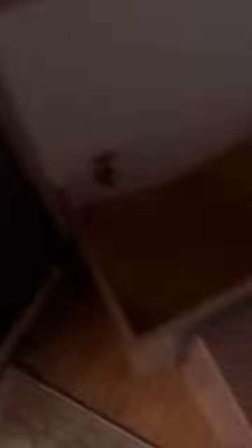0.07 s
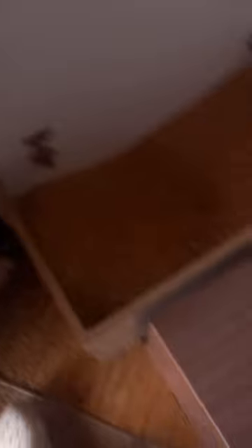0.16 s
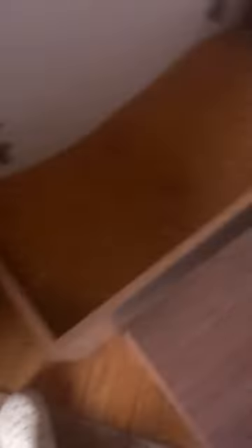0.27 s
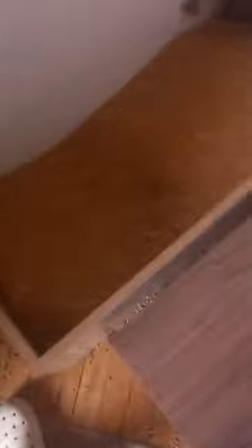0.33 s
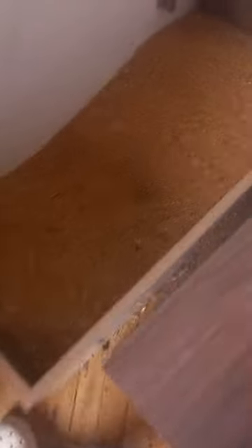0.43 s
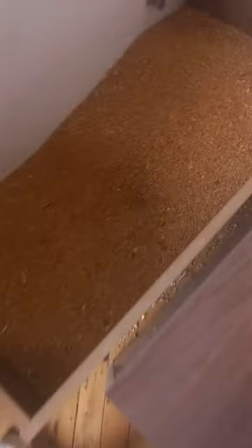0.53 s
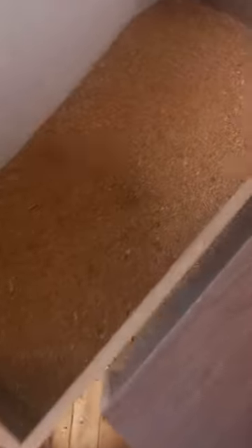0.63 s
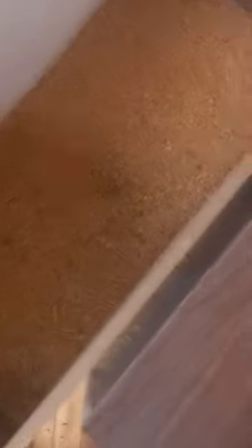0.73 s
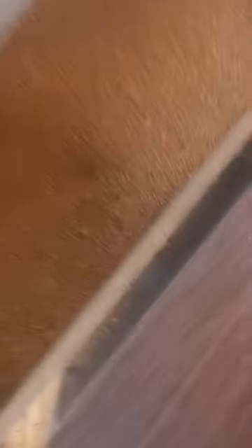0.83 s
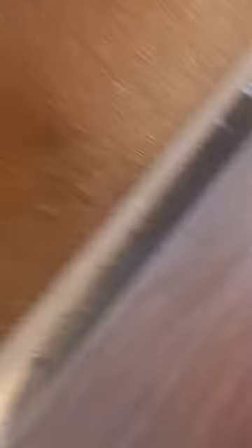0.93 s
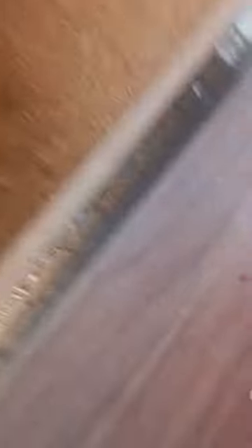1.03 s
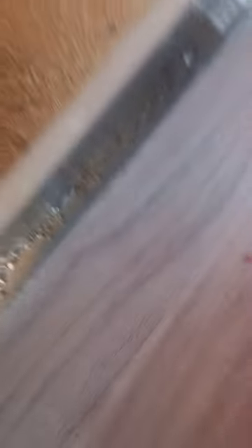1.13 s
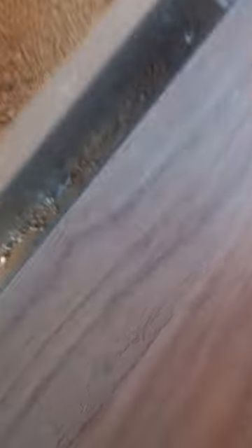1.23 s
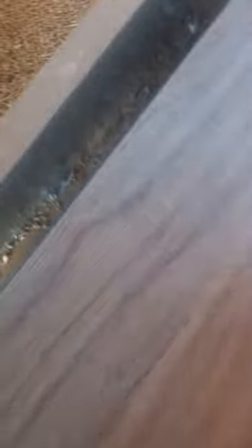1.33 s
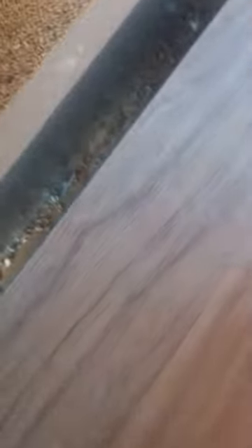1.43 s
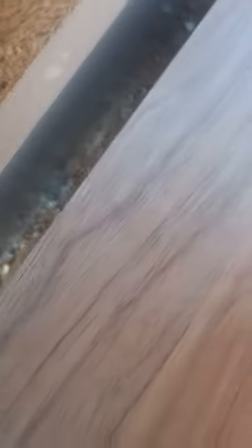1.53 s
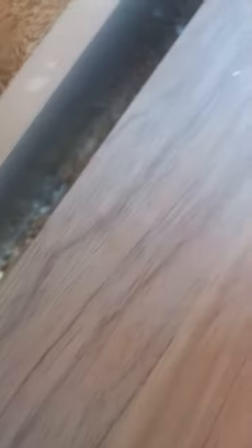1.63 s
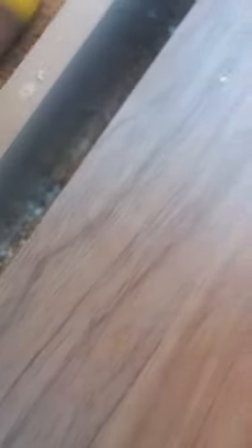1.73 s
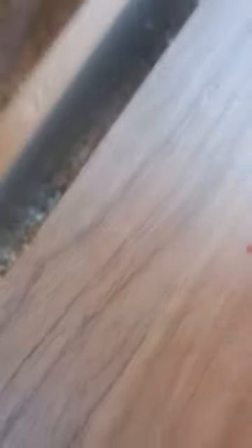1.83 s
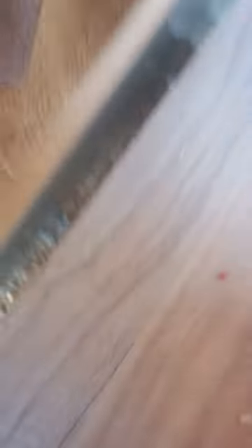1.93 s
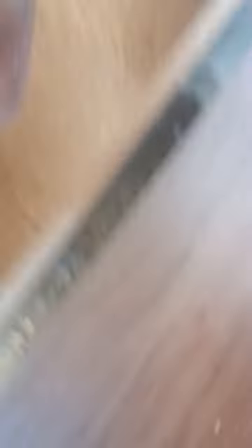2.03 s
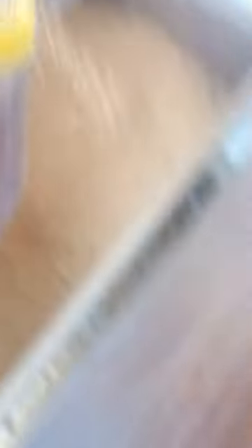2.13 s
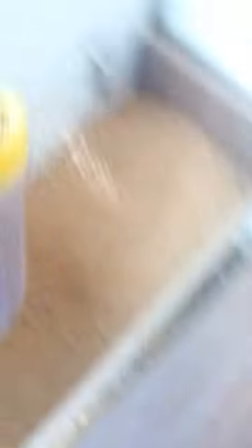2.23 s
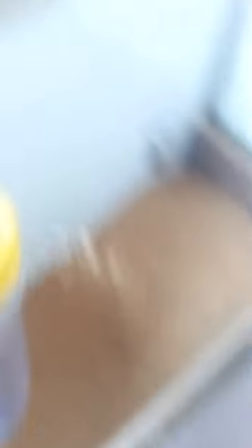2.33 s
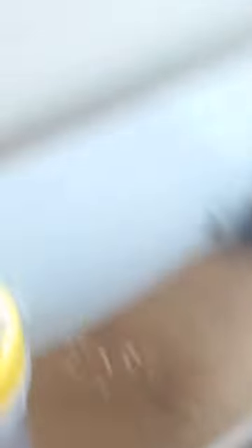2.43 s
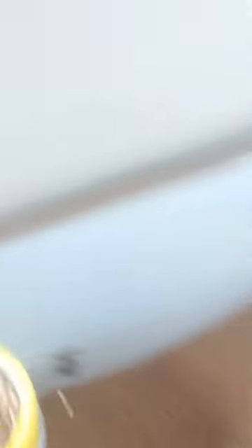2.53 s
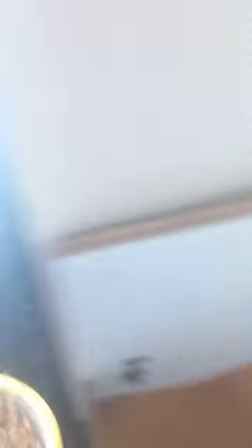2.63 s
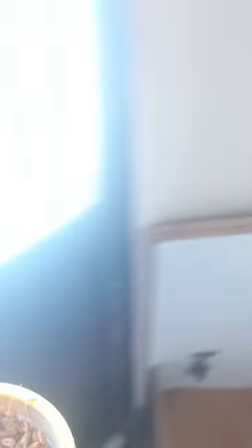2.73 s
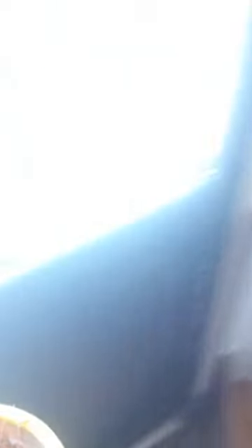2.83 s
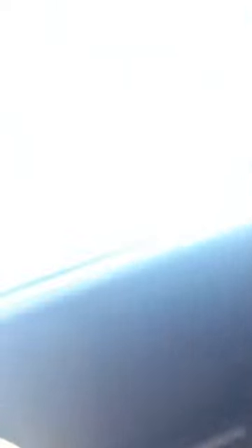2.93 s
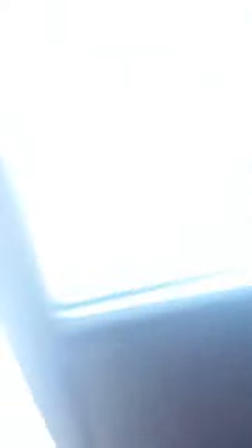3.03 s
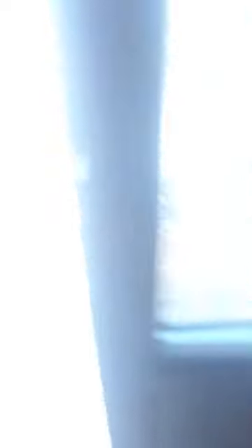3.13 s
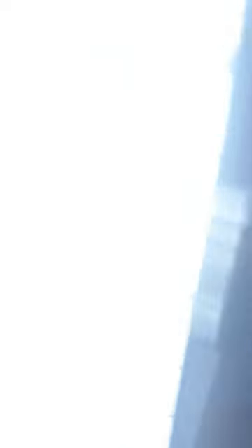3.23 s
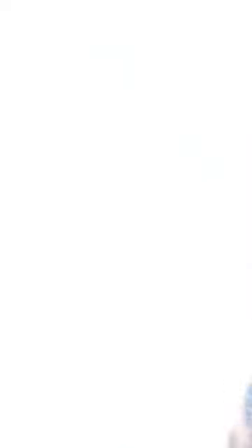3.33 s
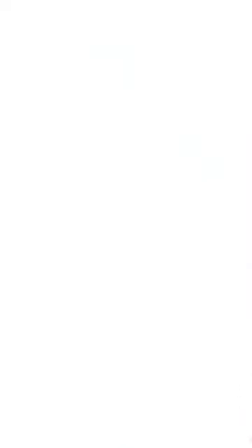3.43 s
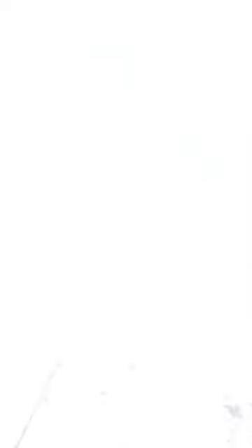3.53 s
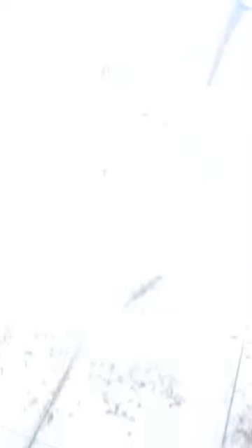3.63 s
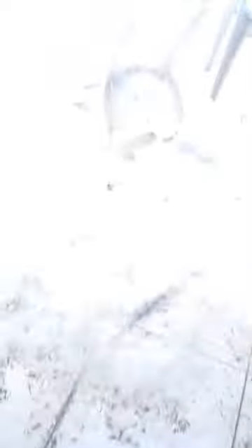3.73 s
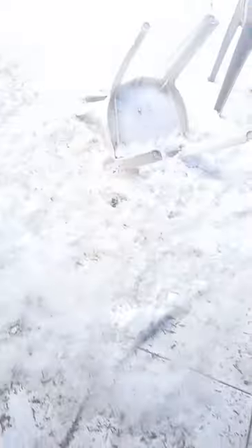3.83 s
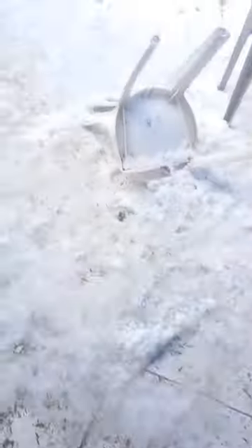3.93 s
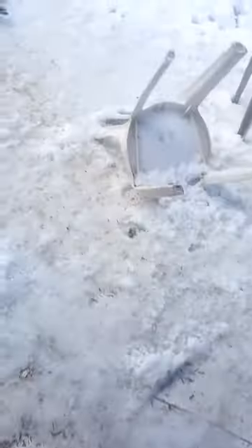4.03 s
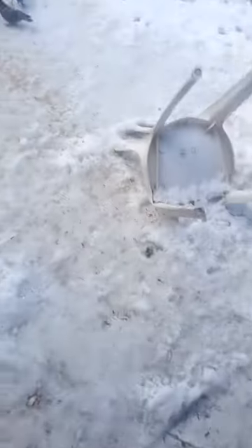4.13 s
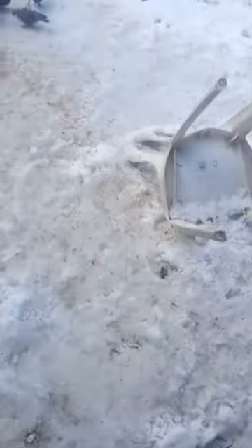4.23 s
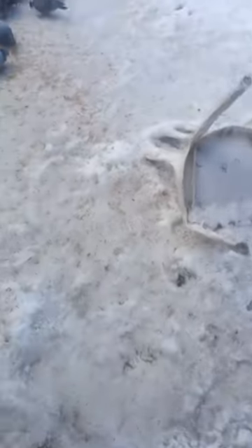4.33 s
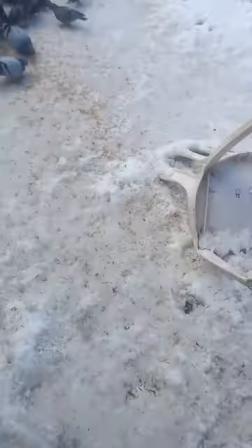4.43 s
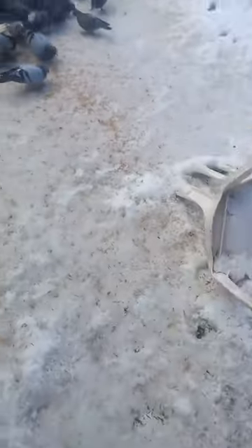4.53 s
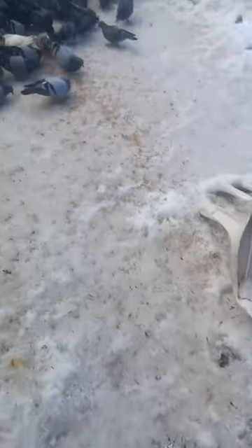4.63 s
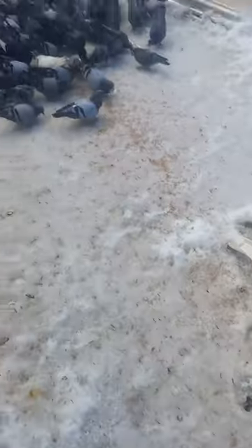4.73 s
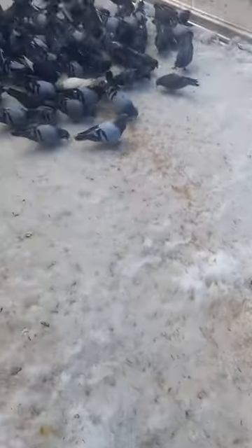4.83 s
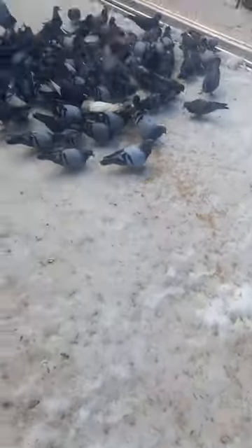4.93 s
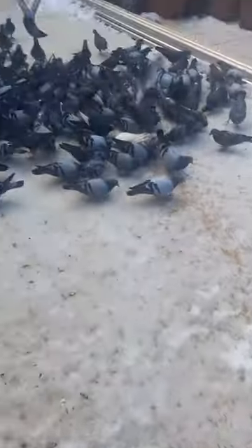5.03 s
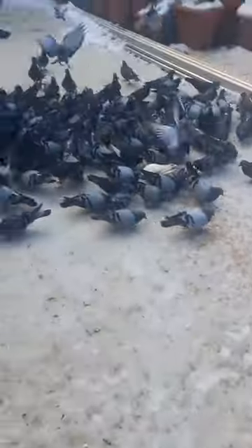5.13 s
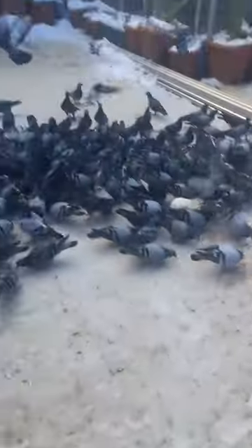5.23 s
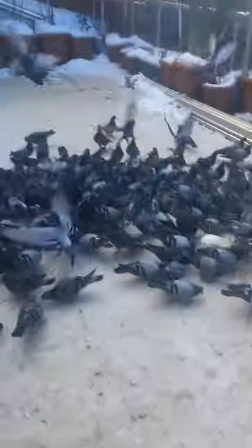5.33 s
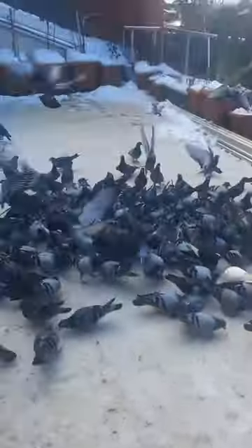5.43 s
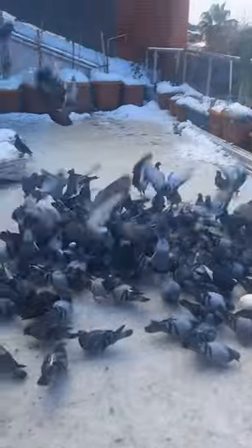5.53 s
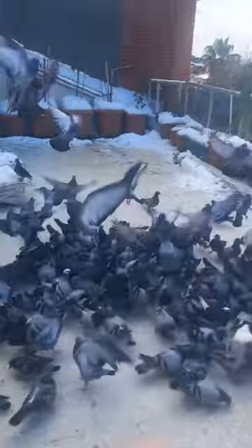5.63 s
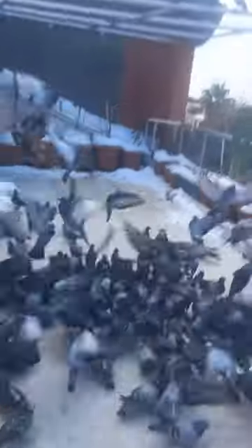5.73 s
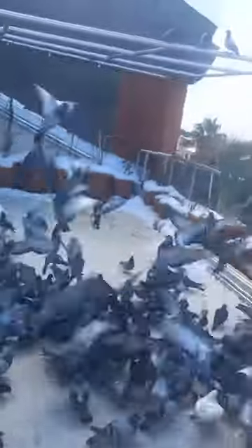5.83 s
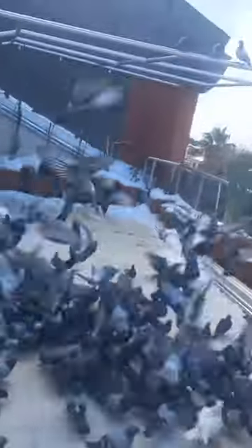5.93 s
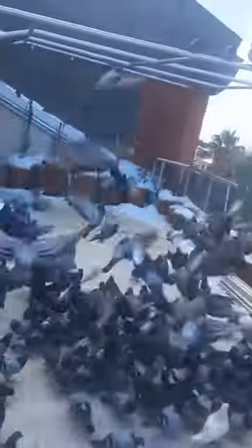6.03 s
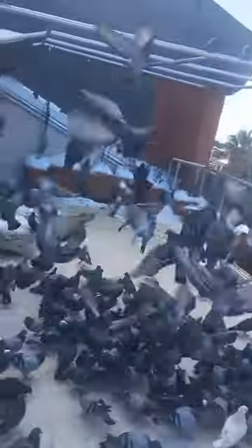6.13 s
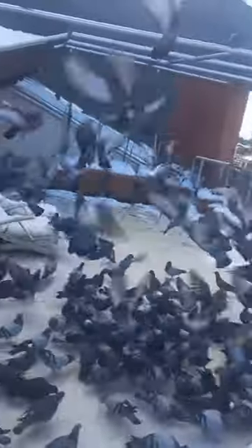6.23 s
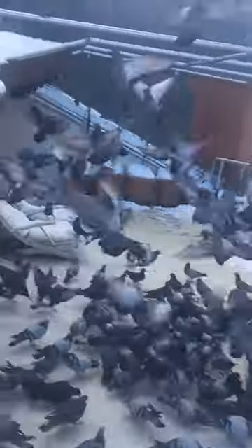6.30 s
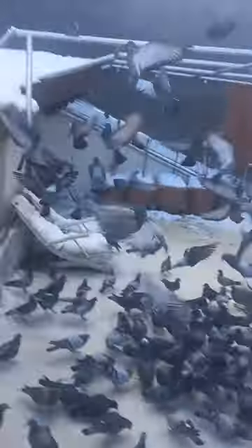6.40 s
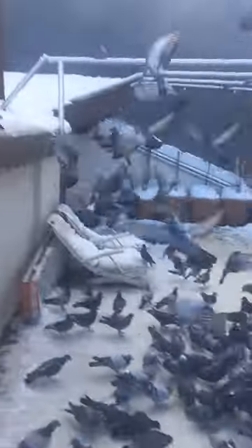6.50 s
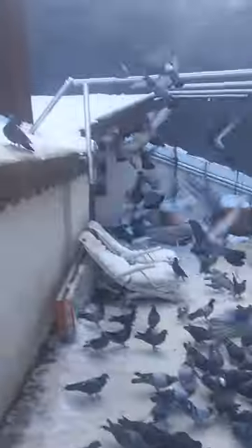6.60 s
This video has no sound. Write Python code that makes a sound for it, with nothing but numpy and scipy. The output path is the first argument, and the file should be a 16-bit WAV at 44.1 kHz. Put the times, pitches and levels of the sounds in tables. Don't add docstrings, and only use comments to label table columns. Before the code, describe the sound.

Near-silence with low air thrum, a dull scuff, then about half a second of dense grain hiss over a hollow wooden boom, fading into shaken kernels. A sharp latch knock follows, then shoes stepping outside. Close pigeons clap wings singly, then suddenly the flock whirs up with puffs, slaps and feather rustle, echoing briefly off terrace walls, heard on a close stereo phone.

```python
import sys
import numpy as np
from scipy import signal
from scipy.fft import rfft, irfft, next_fast_len
from scipy.io import wavfile
from scipy.ndimage import uniform_filter1d

SR = 44100
rng = np.random.default_rng(int(sys.argv[2]) if len(sys.argv) > 2 else 0)


def ratio_of_db(decibels):
    return 10 ** (np.asarray(decibels, float) / 20)


def unload_wav(signal):
    wavfile.write(
        sys.argv[1],
        SR,
        np.round(np.clip(np.atleast_2d(signal).T, -1, 1) * 32767).astype(np.int16),
    )


N = 293869
M = next_fast_len(N)
HZ = np.fft.rfftfreq(M, 1 / SR) + 1e-3
T = np.arange(N) / SR

# pitch_hz, level_db (per Hz)
FLUTTER = [(470, -11), (800, -8.5), (1170, -4), (1400, -4), (1570, 3.5), (1750, -5.5), (1900, -7),
           (2080, -2.5), (2400, -9), (3200, -12.5), (4160, -10.5), (7040, -120)]
# time_s, flutter_db
STIR = [(0, -64.5), (.55, -63.5), (.62, -68), (1.2, -66.5), (2.25, -61), (2.65, -68), (2.8, -66),
        (2.83, -61.5), (3.28, -59.5), (3.55, -60), (3.85, -55.5), (4.3, -57.5), (4.55, -56), (5.2, -56),
        (5.46, -51), (5.75, -37.5), (6.1, -44.5), (6.66, -44)]
CALM_DB = -57


def unit(x):
    return x / np.sqrt(np.mean(x ** 2))


def shape(x, gain):
    return irfft(rfft(x, M) * gain, M)[..., :N]


def on_hz(points):
    hz, value = np.transpose(points)
    return np.interp(np.log(HZ), np.log(hz), value)


def tint(x, points):
    low, high = points[0], points[-1]
    closed = [(low[0] / 2, low[1] - 30), *points, (high[0] * 2, high[1] - 30)]
    return unit(shape(x, ratio_of_db(on_hz(closed))))


def pair(a, b):
    # pitch_hz, left_right_likeness (0-1)
    likeness = [(60, 0.85), (130, 0.96), (290, 0.93), (640, 0.68), (1400, 0.12), (3000, 0.07), (20000, 0)]
    alike = np.clip(on_hz(likeness), 0, 1)
    mid = shape(a, np.sqrt(1 + alike))
    side = shape(b, np.sqrt(1 - alike))
    return np.array([mid + side, mid - side]) / np.sqrt(2)


def hiss():
    return pair(*rng.standard_normal((2, N)))


def grains(rate, spread_db):
    struck = rng.random((2, N)) < rate / SR
    sign = rng.choice([-1, 1], (2, N))
    return struck * sign * ratio_of_db(spread_db * rng.exponential(size=(2, N)))


def beats(rate, length_s, spread_db, steady):
    t = np.arange(4410) / SR
    puff = t * np.exp(-t / length_s)
    power = np.abs(signal.fftconvolve(grains(rate, spread_db)[0] ** 2, puff ** 2)[:N])
    return unit(np.sqrt(steady + power / uniform_filter1d(power + 1e-9, size=13000)))


def read(tables):
    time_s, level_db = np.vstack(tables).T
    return np.interp(T, time_s, level_db)


def pan(db):
    return ratio_of_db(np.array([db, -db]) / 2)


def hits(kinds, body, ring_s, rise_s):
    slap, dry = np.zeros((2, 2, N + 4410))
    t = np.arange(4410) / SR
    fade, rise = np.log(1000) * t / ring_s, np.minimum(t / rise_s, 1)
    rows = [(*row, hz) for table, hz in kinds for row in table]
    noises = rng.standard_normal((len(rows), 2, 4410))
    for (s, db, snap_db, thump_db, pan_db, hz), air in zip(rows, noises):
        i = int((s - rise_s / 2) * SR)
        size = ratio_of_db(db) * pan(pan_db)[:, None]
        snap_hz = hz * ratio_of_db(1.1 * air[1, 1])
        band = signal.butter(2, [snap_hz / 1.68, min(snap_hz * 2.0, .45 * SR)], "band", fs=SR)
        crack = unit(signal.lfilter(*band, air[0] + 23.0 * air))
        white_edge = .6 * min(hz / 5400, 1) ** 3 * np.diff(air, prepend=0)
        snap = ratio_of_db(snap_db + 3.0) * np.exp(-1.3 * fade) * rise * (crack + white_edge)
        ping_hz = 1570 * ratio_of_db(0.82 * air[1, 0])
        ping = 0.52 * rise * np.sin(2 * np.pi * ping_hz * t) * np.exp(-t / 0.0052)
        push_hz = 360 * ratio_of_db(1.3 * air[0, 0])
        push = np.sin(2 * np.pi * push_hz * t) * np.exp(-t / 0.0016) * np.minimum(t / 0.0014, 1)
        slap[:, i:i + 4410] += size * np.exp(-fade) * rise
        dry[:, i:i + 4410] += size * (snap + ping + ratio_of_db(thump_db + 3.0) * push)
    near = rng.standard_normal(N) + 2.86 * hiss()
    return ratio_of_db(1.5) * (slap[:, :N] * tint(near, body) + dry[:, :N])


def walls(x, t60_s, wall_db):
    t = np.arange(22050) / SR
    tail = hiss()[:, :22050] * np.exp(-np.log(1000) * t / t60_s) * (t > .003)
    tail = signal.lfilter([1], [1, -.6], tail)
    tail = tail / np.sqrt(np.sum(tail[0] ** 2))
    return x + ratio_of_db(wall_db) * signal.fftconvolve(x, tail, axes=1)[:, :N]


def scoop():
    # pitch_hz, level_db (per Hz)
    kernel_tone = [(470, 1), (800, -13), (1590, 1), (2240, -5), (2750, -3), (3830, 3.5), (12500, -0.5),
                   (16000, -0.5)]
    # pitch_hz, level_db (per Hz)
    spray_tone = [(3000, -23), (5500, -1.5), (7500, 1), (9500, -4), (13000, 1.5), (16000, -1.5)]
    # pitch_hz, width_hz, level_db
    bin_modes = [(178, 58, 6), (300, 137, 3), (399, 136, 2.5), (2190, 130, 0.5)]
    # time_s, flow_db
    dig = [
        (1.213, -57),
        (1.221, -37),
        (1.287, -36),
        (1.445, -33.5),
        (1.503, -31),
        (1.667, -34),
        (1.769, -49.5),
        (1.8, -47.5),
    ]
    # time_s, flow_db
    level_off = [
        (1.908, -48),
        (1.998, -47),
        (2.012, -45),
        (2.164, -47),
        (2.264, -43.5),
        (2.466, -50.5),
        (2.56, -56.5),
        (2.7, -62),
        (2.85, -102),
    ]
    # start_s, rise_s, fall_s, hiss_db, pan_db (left minus right)
    tosses = [
        (5.31, 0.033, 0.062, -45.5, -5),
        (5.699, 0.076, 0.054, -26, 2.5),
        (5.89, .05, .15, -44, 0),
        (3.66, .11, .12, -58, -1),
    ]
    age = T - dig[0][0]
    shaken = np.clip((T - dig[-1][0]) / 0.39, 0, 1)
    kernels = tint(pair(*grains(12000, 0.96)), kernel_tone)
    spray = tint(pair(*grains(7000, 2.0)), spray_tone)
    slide = (1 - .3 * shaken) * kernels + .75 * shaken * beats(110, .004, 2.4, .45) * spray

    modes = sum(ratio_of_db(db) / (1 + 1j * (HZ / hz - hz / HZ) * hz / width) ** 2 for hz, width, db in bin_modes)
    boom_build = np.clip(age / 0.19, .12, 1)
    boom = unit(shape(hiss(), modes)) * ratio_of_db(-11 - 25 * shaken) * boom_build
    rattle = shaken * ratio_of_db(-9) * tint(hiss(), FLUTTER)
    bite = ratio_of_db(-30.5) * np.clip((0.048 - age) / .004, 0, 1) * spray

    swing = np.exp(-((T - 1.7) / 0.29) ** 2)
    pan_db = 4 + 2 * swing - 2 * np.clip(T - 2.2, 0, .6)
    cup = ratio_of_db(read([dig, level_off])) * (slide + boom + rattle) + bite
    flying = 0
    for s, rise_s, fall_s, db, side_db in tosses:
        arc = np.clip(np.minimum((T - s) / rise_s, 1.4 - (T - s - rise_s) / fall_s), 0, 1) ** 2
        flying = flying + ratio_of_db(db) * pan(side_db)[:, None] * arc
    return np.clip(age / 0.0027, 0, 1) * pan(pan_db) * cup + flying * (kernels + 1.33 * spray)


def wing_claps():
    # start_s, peak_db, snap_db, thump_db, pan_db
    claps = [(4.4838, -33.5, -4, 0, 4), (4.5873, -34, 0, -20, 1), (4.6174, -33, 4.5, -8, 2),
             (4.7038, -32.5, -10, -13, 5), (4.7208, -39, 8.5, 2, 4), (4.7856, -25, -4.5, -7, -5),
             (4.8405, -39.5, 5.5, 6, 3), (4.9007, -41.5, 2, 6, -9), (4.9312, -40, -8.5, -4, 15),
             (5.0978, -30.5, -27, 1, 2.5), (5.148, -49, 4.5, -12, -2), (4.493, -42.5, 6.5, -10, 2),
             (5.398, -47, 8, -10, 0), (5.2722, -31.5, -8, -23, -1), (5.443, -30, -6, 1, 0)]
    # start_s, peak_db, snap_db, thump_db, pan_db
    takeoff = [
        (5.5715, -22, 1.5, 3.5, 1),
        (5.8815, -19.5, -5, 10.5, 0.5),
        (5.688, -30.5, 10, -13, 0),
        (5.9121, -28, 8, -10, 0),
        (5.9523, -12, -2.5, -5, 0),
        (6.0798, -22, -3.5, 1, 0.5),
        (6.4048, -21, -19, 1, 2),
        (6.534, -20.5, -9, -6, 4),
        (6.4344, -27.5, -1, 9, 4),
        (6.6035, -17, -3, -0.5, 0.5),
    ]
    # start_s, peak_db, snap_db, thump_db, pan_db
    slaps = [(4.777, -37, 4, -20, -5), (4.7923, -34, -8, -23, 17), (4.8698, -30.5, -22, -4, 2),
             (5.1912, -35.5, 1, -21, 4), (5.3163, -35.5, 3, -19, -10), (5.3449, -37, 6.5, -31, 9),
             (5.352, -29, -11, -25, -9), (5.4746, -31, 4.5, -22, -9.5), (5.4812, -25.5, -5.5, -24, 12)]
    # start_s, peak_db, snap_db, thump_db, pan_db
    far_claps = [
        (3.149, -53, 9, -15, 2),
        (3.215, -44.5, 8, -12, 3),
        (3.25, -43, 2.5, -8, 6),
    ]
    # start_s, peak_db, snap_db, thump_db, pan_db
    flaps = [(5.565, -18, -12, -2, -1), (5.62, -37, -15, -11, -4), (5.649, -17.5, -9, -27, 4),
             (5.664, -21.5, -21, -2, 3), (5.69, -15.5, -2, -4, 3), (5.726, -18, -15, 5, -3),
             (5.747, -20.5, -17, 2.5, -4), (5.787, -20.5, -13, -18, -5), (5.806, -15, -23, -18, 3),
             (5.845, -15.5, -3, 3, -4.5), (5.972, -16.5, -12, 3, 1), (5.992, -38, -10, -7, -3),
             (6.032, -19, -3, 2, 0), (6.121, -19.5, -6, -1, 0), (6.166, -24.5, -21, -7, 2),
             (6.176, -21, -19, 3, 0), (6.233, -17, -25, -25, 5), (6.291, -27.5, -19, 1, 2),
             (6.338, -19.5, 1, 4, 1), (6.357, -20, -9, 0, -1), (6.444, -29, -10, 1, 3),
             (6.63, -22.5, -18, -7, -9), (5.529, -27, -15, -14, -4), (5.674, -26, -15, -3, -7),
             (6.311, -26, -13, -3, -7), (6.348, -26, -2, -10, 8), (6.482, -29, -16, 3, 6),
             (6.192, -26, -15, 6, -2)]
    sharp = hits([(claps, 5400), (takeoff, 5400), (slaps, 2630), (far_claps, 3380)], FLUTTER, 0.015, .0015)
    rounded = hits([(flaps, 4400)], FLUTTER, 0.016, .005)
    return walls(sharp + rounded, 0.24, -5.5)


def flock():
    # pitch_hz, level_db (per Hz)
    stroke_tone = [(110, -4.5), (190, -3), (301, 1.5), (383, 0), (437, -6.5), (615, -5.5), (1000, -11.5),
                   (1300, -61), (2200, -120)]
    # pitch_hz, level_db (per Hz)
    feather_tone = [(1800, -20), (2600, -5), (3600, -5), (5600, -3.5), (7000, -5), (9300, -10),
                    (13500, -4.5), (15900, -7)]
    # middle_s, length_s, puff_db, flutter_db
    sweeps = [(0.264, 0.068, -67, -67), (1.17, 0.23, -61, -72), (2.72, 0.16, -56, -67),
              (3.087, 0.038, -51, -54), (3.227, 0.21, -49, -67), (3.902, 0.038, -49, -57),
              (4.577, 0.19, -46, -73), (4.724, 0.08, -48.5, -74), (5.187, 0.035, -55, -70),
              (5.346, 0.032, -67, -38), (5.79, 0.11, -51, -58), (0.525, 0.037, -61, -63),
              (0.737, 0.17, -60, -65), (2.845, 0.05, -57, -56.5), (2.714, 0.029, -53, -70),
              (2.644, 0.035, -65, -59.5), (2.84, 0.046, -57, -70), (3.17, 0.061, -63, -74),
              (3.733, 0.11, -49, -49), (5.59, .06, -47, -67), (6.564, 0.12, -37, -51)]

    def swept(column):
        return sum(ratio_of_db(2 * row[column]) * np.exp(-(2 * (T - row[0]) / row[1]) ** 2) for row in sweeps)

    flutter_db = read([STIR])
    stir_db = flutter_db - CALM_DB
    stroke_db = -53 + 1.366 * stir_db
    feather_db = np.minimum(-59.5 + 1.11 * stir_db, -36)
    near = np.clip((flutter_db + 60) / 9, .35, 1)
    down = 1 + near * (beats(150, .006, 1.9, .7) - 1)
    tips = 1 + near * (beats(90, .005, 2.6, .45) - 1)
    barbs = 1 + near * (beats(90, .004, 2.6, .4) - 1)
    stroke = np.sqrt(ratio_of_db(2 * stroke_db) + swept(2)) * down * tint(hiss(), stroke_tone)
    flutter = ratio_of_db(4.0) * np.sqrt((ratio_of_db(2 * flutter_db) + swept(3)) * down * tips) * tint(hiss(), FLUTTER)

    rustle = tint(hiss() + .8 * grains(1500, 2.6), feather_tone)
    fine = shape(rustle, 1 / (1 + (6500 / HZ) ** 4))
    through_wall = ratio_of_db(-8 * np.clip(-stir_db / 11, 0, .65))
    feather = ratio_of_db(feather_db + 6) * (tips * (rustle - fine) + through_wall * np.sqrt(tips * barbs) * fine)
    return pan(0.13)[:, None] * (stroke + flutter + feather)


def whistles():
    # middle_s, pitch_hz, level_db, length_s
    downstrokes = [(4.988, 7900, -59, .02), (5.027, 7900, -57, .015), (5.09, 8100, -60, 0.031),
                   (5.225, 8140, -52, 0.014), (4.73, 8050, -55, .02), (5.29, 7900, -60, .02)]
    out = np.zeros(N)
    for s, hz, db, length_s in downstrokes:
        turn = 2 * np.pi * hz * (T - s)
        out += ratio_of_db(db) * np.exp(-((T - s) / length_s * 2) ** 2) * (np.sin(turn) + .4 * np.sin(.52 * turn))
    breath = uniform_filter1d(rng.standard_normal(N), size=40) * 6
    return out * (1 + .5 * breath)


def door():
    # start_s, peak_db, snap_db, thump_db, pan_db
    latch = [
        (3.421, -23.5, -10, -15, -2),
        (3.4255, -27, -10.5, -5, -6),
        (3.4315, -29, -34, -14.5, 25),
        (3.4375, -21, -20, -4, -2),
    ]
    # pitch_hz, level_db (per Hz)
    plate = [(500, -16), (800, -8), (1200, -11), (1450, -4), (1570, 4), (1700, -4), (2000, -9),
             (3000, -20.5)]
    clack = walls(hits([(latch, 3900)], plate, 0.03, 0.005), 0.2, -10.5)
    age = T - latch[0][0]
    hum = unit(shape(hiss(), 1 / (1 + ((HZ - 1540) / 140) ** 2)))
    return clack + ratio_of_db(-32 - 60 * np.abs(age) / 0.36) * np.clip(age / .004, 0, 1) * hum


def sill():
    # start_s, peak_db, snap_db, thump_db, pan_db
    steps = [
        (3.6686, -39, -22, -6, -1),
        (3.695, -44, -22, 0, -.5),
        (3.7194, -46, -10, 0, -1.5),
        (3.7324, -46, -22, 4, -1),
        (3.7818, -38, -22, -8, -1.5),
        (3.8706, -43, -22, 3, 1.5),
        (4.1134, -40, -16, -12, -.5),
    ]
    return ratio_of_db(5) * walls(hits([(steps, 2200)], FLUTTER, .03, .004), .1, -10)


def indoor_knocks():
    # start_s, peak_db, snap_db, thump_db, pan_db
    taps = [
        (.6735, -38.5, -27, -25, -6),
        (1.8075, -39.5, 18.5, -18, 3),
        (1.8137, -48.5, 18, -27, 8.5),
    ]
    # start_s, peak_db, snap_db, thump_db, pan_db
    scuffs = [
        (.252, -51, -16, -24, 11),
        (.525, -49.5, -6, -6, 1),
        (.555, -68, -16, -15, -2),
        (.69, -59, -26, -30, 2),
        (.71, -41, -22, -20, -1),
        (.735, -48, -20, -13, 9),
    ]
    # start_s, peak_db, snap_db, thump_db, pan_db
    strays = [(1.9208, -66, 25, 2, 7), (2.0086, -58.5, 20, -15, 12), (2.0213, -59, 23, -7, 6),
              (2.068, -54, 16, -9, 10), (2.1188, -47.5, 6, -12, -10), (2.1967, -56, 0, -18, 3),
              (2.233, -49, -1, -15, 7), (2.245, -52, 2, -5, 0), (2.2893, -56, 13, 3, -3),
              (2.387, -57.5, 18.5, -16, 0), (2.477, -55.5, 10, 7, 4), (2.5194, -59, 10, 10, -4),
              (2.556, -70, 21, -8, -3), (2.8673, -43, -2.5, -6, 2), (3.116, -53, 7.5, 5, 1),
              (1.945, -65, 18, -10, 6), (1.98, -57, 17, -10, -1), (2.3, -54, 13, -10, 2),
              (2.495, -68, 16, -10, -3)]
    # start_s, peak_db, snap_db, thump_db, pan_db
    flick = [
        (3.7818, -58, 17, -13, 2),
        (3.705, -62, 14, -13, 0),
    ]
    rim = walls(hits([(taps, 2410)], FLUTTER, 0.0054, 0.0017), 0.087, -8)
    soft = hits([(scuffs, 2410)], FLUTTER, 0.052, 0.013)
    kernels = hits([(strays, 8600), (flick, 10500)], FLUTTER, 0.025, 0.0021)
    return rim + walls(soft + kernels, 0.17, -0.64)


def swings():
    # middle_s, peak_db, pitch_hz, length_s
    pushes = [(0.763, -41, 97, 0.013), (3.4267, -32, 1640, 0.0022), (3.4333, -25, 845, 0.0011),
              (3.672, -38.5, 1205, 0.0031), (3.696, -29.5, 690, 0.00092), (3.782, -43, 1520, 0.0034),
              (4.119, -39, 915, 0.0021), (5.9544, -9.5, 1655, 0.00098), (3.727, -40, 272, 0.009),
              (3.7326, -27, 436, 0.0013), (.255, -55, 1160, .008), (3.879, -38, 477, 0.0067),
              (4.59, -31, 1080, 0.002), (5.711, -20, 324, 0.0037), (5.75, -36, 246, 0.0013),
              (5.868, -29, 324, 0.0061), (5.889, -27, 350, 0.0025), (6.157, -25.5, 350, 0.008),
              (6.235, -19, 298, 0.0041), (6.358, -30, 376, 0.0062), (6.409, -30, 307, 0.002),
              (6.566, -31, 412, 0.01), (5.885, -35, 800, 0.0014), (6.23, -24, 646, 0.0013),
              (6.289, -28, 330, 0.0054), (6.514, -28.5, 375, 0.0077), (6.465, -28, 390, 0.0061),
              (6.369, -35, 300, 0.0045)]
    out = np.zeros(N + 4410)
    t = np.arange(-2205, 2205) / SR
    for s, db, hz, length_s in pushes:
        i = int(s * SR) - len(t) // 2
        out[i:i + len(t)] += ratio_of_db(db) * np.exp(-(t / length_s) ** 2) * np.cos(2 * np.pi * hz * t)
    return out[:N]


def thrum():
    # pitch_hz, level_db (per Hz)
    thrum_tone = [(30, -16), (52, -3), (85, 4.5), (107, 5.5), (130, -0.5), (150, -3.5), (190, -10)]
    # middle_s, peak_db, length_s, pan_db (left minus right)
    gusts = [(0.765, -37.5, 0.094, -0.5), (1.1, -47, 0.061, 4), (1.678, -42.5, 0.086, 3),
             (1.927, -50.5, 0.14, 18), (2.137, -53.5, 0.14, 24), (2.62, -38.5, 0.1, -20),
             (2.716, -37, 0.12, -13.5), (2.866, -41, 0.041, -9), (3.123, -43, 0.036, 2),
             (3.467, -40.5, 0.12, -6), (3.604, -40, 0.053, .1), (3.722, -36, 0.042, -3),
             (3.837, -36.5, 0.064, -2), (4.085, -47, 0.072, 20), (4.504, -32, 0.027, -1),
             (4.698, -36, 0.064, -1), (4.903, -37, 0.1, -3), (5.07, -37, 0.15, -2), (5.27, -37, 0.11, 6),
             (5.49, -32, 0.06, -6), (5.582, -30, 0.12, -3), (5.752, -28, 0.034, -9),
             (5.897, -22, 0.058, -3), (6.026, -23.5, 0.15, -4), (6.24, -24, 0.092, -2)]
    swell = np.clip((T - 0.19) / 0.15, .25, 1)
    steady = ratio_of_db(-43.5 + 0.99 * (read([STIR]) - CALM_DB)) * swell
    power = steady ** 2
    for s, db, length_s, pan_db in gusts:
        gust = ratio_of_db(db) * pan(pan_db)[:, None] * np.exp(-((T - s) / length_s) ** 2 * 2)
        power = power + gust ** 2
    return ratio_of_db(-9.5) * np.sqrt(power) * tint(hiss(), thrum_tone)


def starve(x):
    # pitch_hz, width_hz, share (0-1), from_s, to_s
    hole_bands = [
        (9600, 1100, .13, 0, 5.5),
        (3900, 1300, .12, 1.9, 2.72),
        (3600, 900, .14, 5.67, 6.05),
        (7200, 900, .05, 3.3, 4.45),
    ]
    hz, s, z = signal.stft(x, SR, nperseg=1024)
    share = .008
    for middle, width, part, from_s, to_s in hole_bands:
        closeness = np.exp(-((hz[::7, None] - middle) / width) ** 2)
        share = share + part * closeness * (s[::3] > from_s) * (s[::3] < to_s)
    lost = rng.random(share.shape) < share
    lost = np.repeat(np.repeat(lost, 7, axis=0), 3, axis=1)[:z.shape[1], :z.shape[2]]
    lost = lost & (hz > 2600)[:, None]
    return signal.istft(z * ratio_of_db(-40 * lost), SR, nperseg=1024)[1][:, :N]


def scene():
    birds = wing_claps() + flock() + whistles()
    knocks = door() + sill() + indoor_knocks() + swings()
    return scoop() + birds + knocks + thrum()


def band_limit(x):
    return signal.sosfilt(signal.butter(12, 16830, fs=SR, output="sos"), x)


def record(dry):
    # pitch_hz, level_db
    right_port = [(20, -2), (900, -1), (1570, 3.5), (2300, -0.5), (6800, 2.5), (8100, -5), (8900, -3),
                  (10500, 0), (20000, -1.5)]
    tilt = on_hz(right_port) / 2
    top_cut_db = 50.0 * (HZ > 15900)
    bass_cut = 1 / (1 + (50 / HZ) ** 4.2)
    ports = shape(dry, ratio_of_db(np.array([-tilt, tilt]) - top_cut_db) * bass_cut)
    rounded = np.tanh(ports / 0.75)
    return band_limit(1.058 * starve(rounded))


dry = scene()
out = record(dry)
unload_wav(out)
```